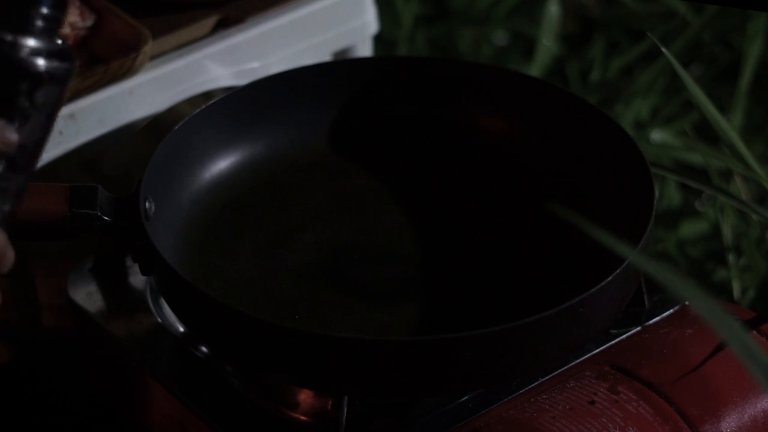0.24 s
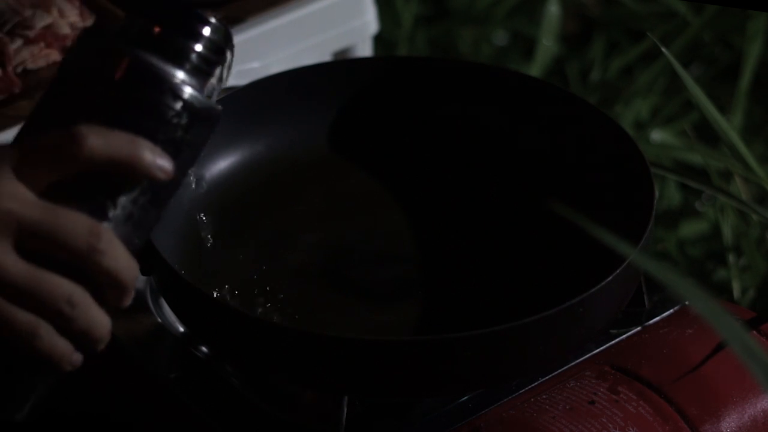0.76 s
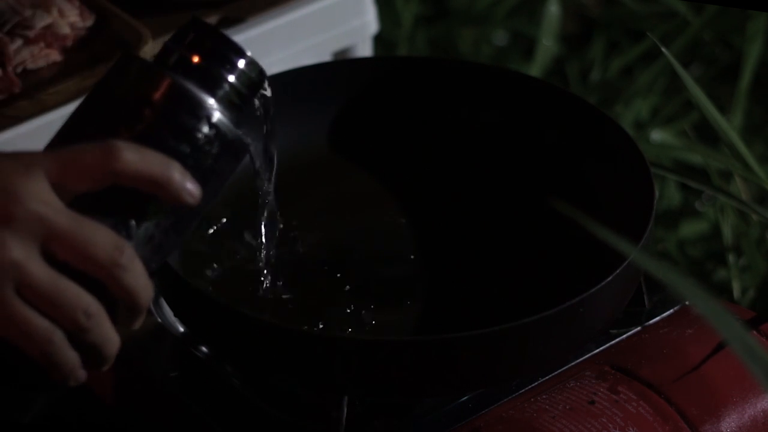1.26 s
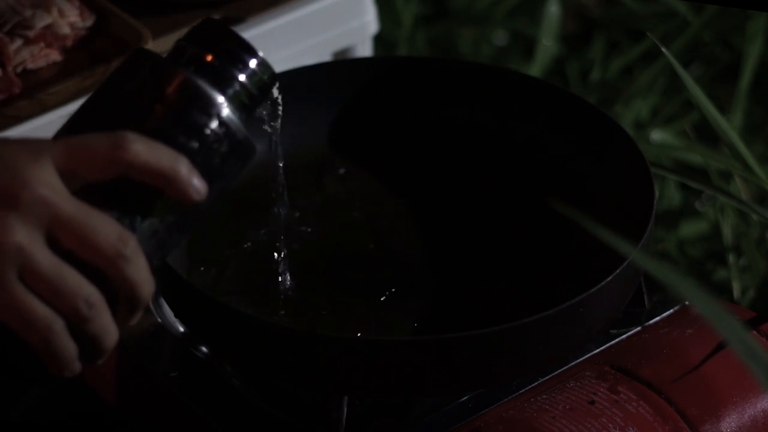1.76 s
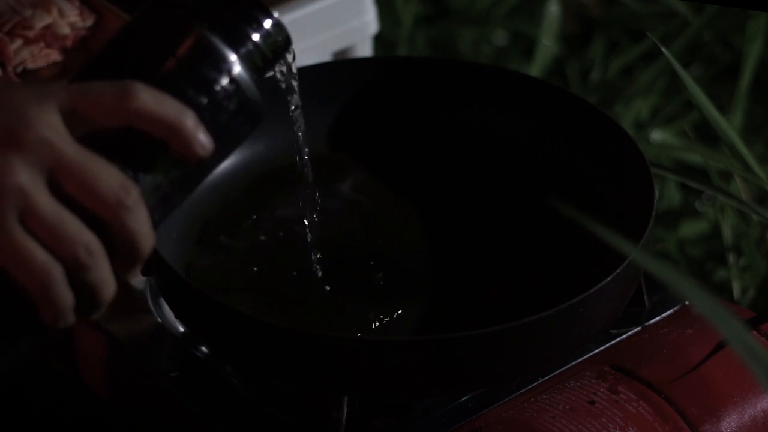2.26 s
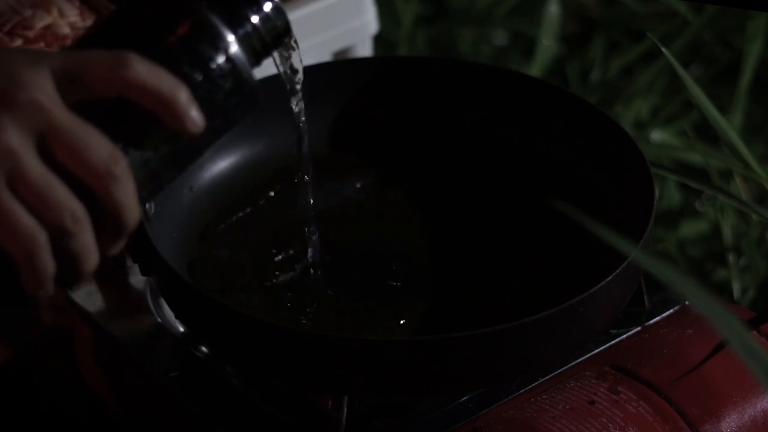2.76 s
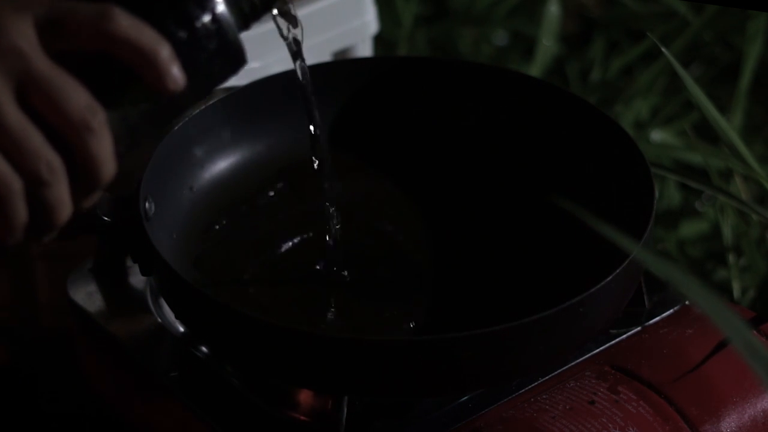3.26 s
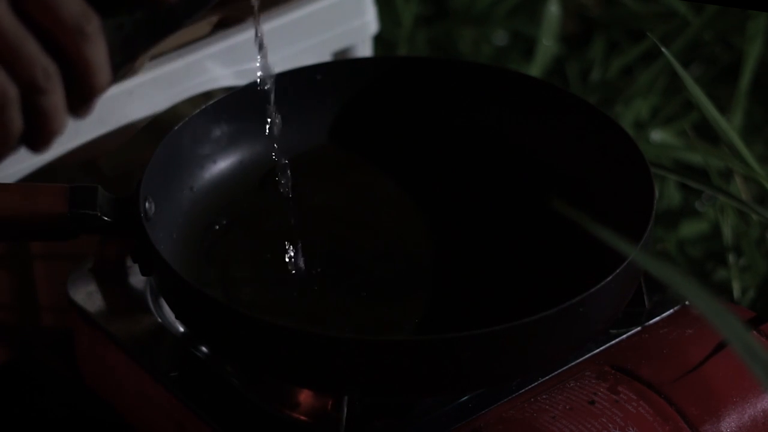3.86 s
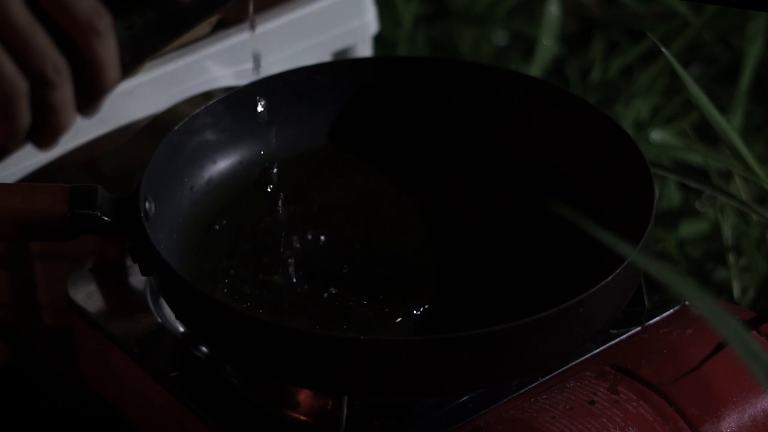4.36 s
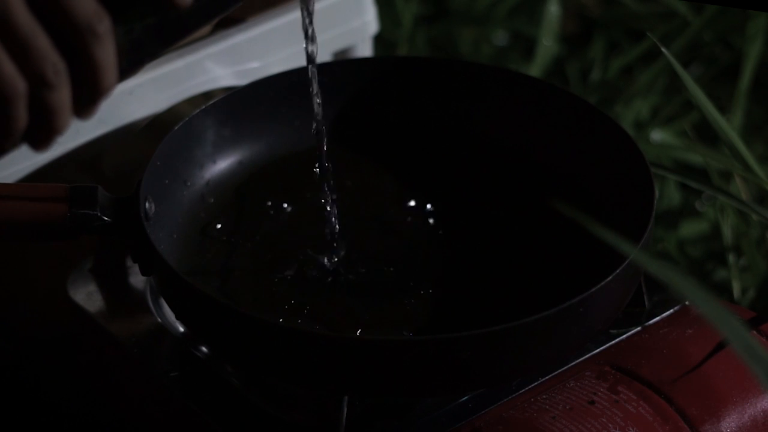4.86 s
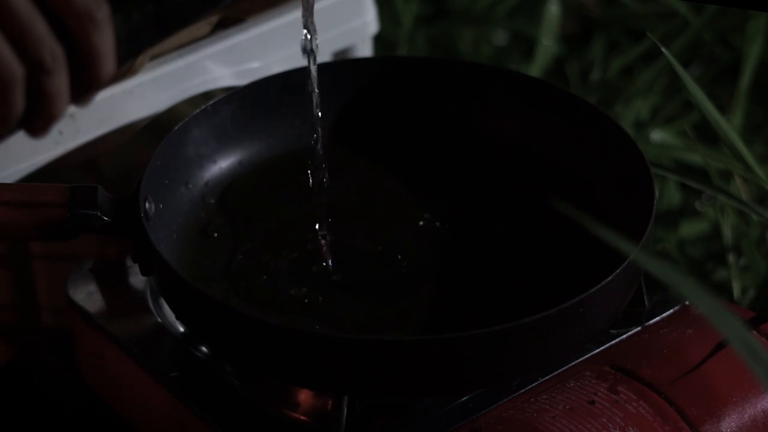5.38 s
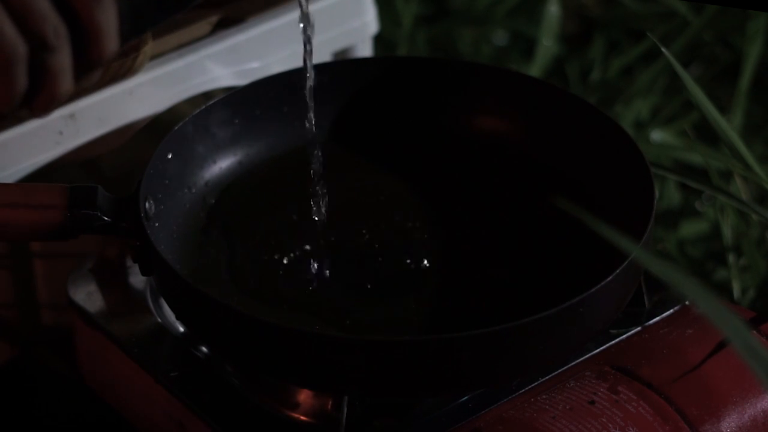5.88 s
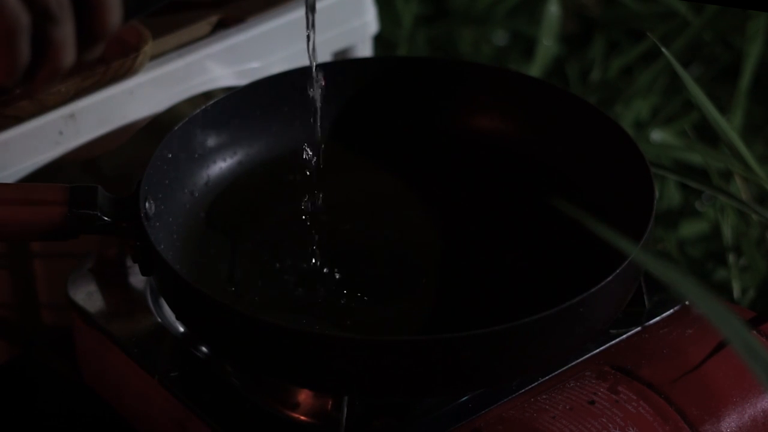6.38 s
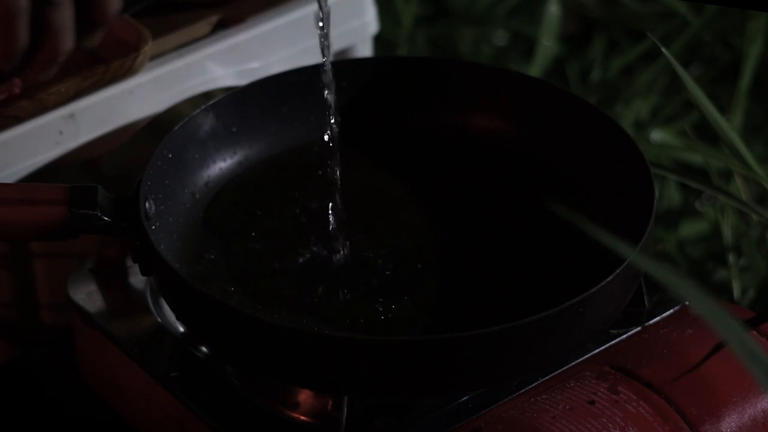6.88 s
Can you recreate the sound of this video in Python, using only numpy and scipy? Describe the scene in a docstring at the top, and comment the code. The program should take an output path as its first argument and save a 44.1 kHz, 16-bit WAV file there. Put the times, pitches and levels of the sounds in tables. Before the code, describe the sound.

Outdoors at night, a steady bed of crickets and fine insect hiss runs throughout. Just before one second a thin stream of water starts hitting a frying pan, faint and fizzy. It stays light until nearly four seconds, then breaks into brighter splashes, crisp droplet ticks and short metallic plinks, busiest in the last two seconds. Close stereo microphone, almost no bass, dry open air.

```python
"""Outdoors at night, among evenly chirping crickets, water runs in a thin stream from a metal flask into a frying pan.
The stream fizzes with tiny bursts and throws ticking droplets, each a snap of shaped noise.
Trapped bubbles plink as short rising sines and ring the pan's modes, whose pitch sinks as it fills.
Crickets are wavering tones over noise bands; a close stereo microphone with almost no bass hears it all,
and its gain dips after the sharpest ticks."""
import sys
import numpy as np
from scipy import signal
from scipy.fft import rfft, irfft, next_fast_len
from scipy.io import wavfile

SR = 44100
rng = np.random.default_rng(int(sys.argv[2]) if len(sys.argv) > 2 else 0)


def master(y):
    """Save y as 16-bit WAV."""
    cut = np.clip(np.atleast_2d(y).T, -1, 1)
    pcm = np.round(cut * 32767)  # scale
    wavfile.write(sys.argv[1], SR, pcm.astype(np.int16))


N = 314433
TIME = np.arange(N) / SR
TOP_HZ = 16000  # upper edge of the treble
# larger bubbles and slugs of water on the pan:
# (time [s], relative level [dB], starting pitch [Hz], relative pan ring [dB], ring tilt [dB per octave])
BUBBLES = [(1.445, -53, 3800, -65.5, 15), (3.816, -38, 5830, -51, -11), (3.876, -53, 4240, -56, -12),
           (4.36, -38, 3800, -64, -1), (4.3788, -24, 3245, -43, -1), (4.859, -32.5, 2860, -61.5, -7),
           (5.3487, -27, 5700, -58, -3), (5.443, -54, 4000, -57.5, -8), (5.6129, -19.5, 3200, -49, 16.5),
           (5.9536, -28, 4750, -48, 2), (6.0035, -39, 4400, -45.5, 0), (6.0888, -23, 4280, -52, 17),
           (6.7768, -30.5, 5940, -52.5, -17), (6.8925, -28.5, 7070, -51.5, -11),
           (6.9869, -33.5, 8000, -59.5, -9), (7.097, -43, 3550, -60, -5), (7.1245, -25.5, 4410, -47, 8)]
# modes of the pan with a little water in it: (nominal pitch [Hz], relative level [dB], t60 [s])
MODES = [(1767, -17.5, 0.18), (2300, -0.5, .23), (2960, -7, 0.16), (3590, -9, 0.28), (3773, 2.5, .25),
         (4630, -7.5, .14)]
TILT_PIVOT_HZ = MODES[1][0]  # ring tilts turn about the second mode


def undb(db):
    """Decibels to gain."""
    return 10 ** (np.asarray(db) / 20)


def curve(rows):
    """Join (time, value) rows by straight lines."""
    return np.interp(TIME, *np.transpose(rows))


def unit(x):
    """Scale to rms 1."""
    return x / np.sqrt(np.mean(np.abs(x) ** 2) + 1e-30)


def sides(right_db):
    """Left and right gains of a source that lies to the right."""
    return unit(undb(np.array([[-right_db], [right_db]]) / 2))


def add(out, s, sound):
    """Mix a sound into out from time s."""
    i = int(np.clip(s * SR, 0, N - 1))
    out[..., i:i + sound.shape[-1]] += sound[..., :N - i]


def colour(x, points):
    """Filter by a spectrum of (frequency [Hz], level [dB]) points; rms 1."""
    hz, db = np.transpose(points)
    size = next_fast_len(N)
    f = np.fft.rfftfreq(size, 1 / SR)
    gain = undb(np.interp(np.log(f + 1), np.log(hz), db))
    return unit(irfft(rfft(x, size) * gain, size)[..., :N])


def band(hz, width_hz, size=N):
    """Noise in a bell-shaped band, unrelated left and right; rms 1."""
    padded = next_fast_len(size)
    bell = np.exp(-2 * ((np.fft.rfftfreq(padded, 1 / SR) - hz) / width_hz) ** 2)
    noise = rng.standard_normal((2, padded))
    return unit(irfft(rfft(noise) * bell, padded)[:, :size])


def walk(rate):
    """Smooth random wandering: `rate` normal draws a second, joined by straight lines."""
    steps = rng.standard_normal(4096)
    return np.interp(TIME * rate, np.arange(len(steps)), steps)


def scatter(x, tail_db, tail_s, wall_s=.0008, wall_db=-8):
    """The pan's wall returns a quick echo, then a short diffuse rattle of reflections."""
    t = np.arange(1500) / SR
    response = rng.standard_normal((2, len(t))) * np.exp(-t / tail_s) * (t > wall_s / 2)
    response *= undb(tail_db) / np.sqrt(np.sum(response ** 2, axis=1, keepdims=True))
    response[:, 0] = 1  # direct sound
    for ear in response:
        ear[int(wall_s * SR * rng.uniform(.6, 1.4))] += undb(wall_db)
    return signal.fftconvolve(np.atleast_2d(x), response, axes=1)


def night(level_db=-53):
    """Even hiss of far insects and air: coloured noise whose level wanders a little."""
    # hiss spectrum: (frequency [Hz], relative level [dB])
    hiss = [(30, -42), (700, -42), (1000, -41.5), (1300, -17.5), (1600, -10.5), (2000, -3.5), (2700, -0.5),
            (3700, 4), (4200, 1), (4700, 4.5), (6100, -1), (7800, -1), (9000, -2.5), (15700, -10)]
    noise = colour(rng.standard_normal((2, N)), hiss)
    return noise * undb(level_db + 0.99 * walk(6.4)) * sides(1.5)


def chorus(flutter_db=1.5, drift_db=0.71):
    """The distant insect chorus: noise bands whose levels flutter fast and drift slowly."""
    # insect bands: (centre [Hz], width [Hz], mean level [dB], to the right [dB])
    bands = [(3142, 130, -56.5, 0.5), (3412, 130, -60, 11.5), (5057, 450, -54, 8.5), (5310, 290, -50, 6),
             (5535, 200, -54.5, 6), (7175, 120, -63.5, 8), (7630, 780, -64, 9.5), (10650, 1100, -64.5, 3.5),
             (12800, 500, -69.5, 3)]
    out = np.zeros((2, N))
    for hz, width_hz, db, right_db in bands:
        level_db = db + flutter_db * walk(70) + drift_db * walk(4.4)
        out += band(hz, width_hz) * undb(level_db) * sides(right_db)
    return out


def chirping(first_s, per_s, song_db, uneven_db):
    """Chirps on an even beat, each a little louder or softer than the song: (time [s], level [dB])."""
    times = np.arange(first_s, N / SR, 1 / per_s)
    db = np.interp(times, TIME, song_db + np.zeros(N)) + uneven_db * rng.standard_normal(len(times))
    return list(zip(times, db))


def cricket(chirps, hz, length_s, width_hz, clear_db, sag_hz, lag_rad):
    """A wing tone that sags through each chirp, blurred by the grass it passes through."""
    loud, sag = np.zeros(N), np.zeros(N)
    u = np.linspace(0, 1, int(length_s * SR))
    for s, db in chirps:
        add(loud, s - length_s / 2, undb(db) * np.sin(np.pi * u))
        add(sag, s - length_s / 2, np.sin(2 * np.pi * u))
    pitch = hz + sag_hz * sag + width_hz / 8 * walk(30)
    phase = 2 * np.pi * np.cumsum(pitch) / SR
    tone = np.sqrt(2) * np.sin(phase - np.array([[lag_rad], [0]]))  # left lags right
    return loud * unit(undb(clear_db) * tone + band(hz, width_hz))


def trilling_cricket():
    """A cricket well to the right sings slow, irregular trills, more blur than tone."""
    # trills: (time [s], level [dB])
    trills = [(.2, -53), (1.03, -52), (1.43, -51), (2.15, -52.5), (2.92, -50.5), (3.55, -54), (4.0, -54),
              (4.5, -55), (5.08, -49), (5.7, -49.5), (6.13, -48.5)]
    song = cricket(trills, hz=4915, length_s=.3, width_hz=150, clear_db=-8.5, sag_hz=9.2, lag_rad=.4)
    return song * sides(12.0)


def high_crickets():
    """Two high crickets on slightly different beats drift in and out of step."""
    out = np.zeros((2, N))
    for first_s, per_s, db in [(.15, 5.397, -56), (.105, 5.195, -59)]:
        chirps = chirping(first_s, per_s, db, uneven_db=-0.2)
        out += cricket(chirps, hz=7253, length_s=.15, width_hz=140, clear_db=1.5, sag_hz=19, lag_rad=1.6)
    return out * sides(4.0)


def low_cricket(song_gain_db=-1.5):
    """The nearest low cricket chirps evenly on and falters once."""
    # its song: (time [s], relative level [dB])
    song = [(0, -45.5), (0.7, -51.5), (1.9, -47.5), (4.8, -48.5), (5.55, -50.5), (5.87, -70), (6.2, -48),
            (7.1, -51)]
    chirps = chirping(.044, 13.862, curve(song) + song_gain_db, uneven_db=1.1)
    tone = cricket(chirps, hz=3180, length_s=0.054, width_hz=125.2, clear_db=8, sag_hz=11, lag_rad=1.2)
    return tone * sides(0.33)


def pan(flow_db, ring_db=3, patter_db=-13, patter_tilt_db=-7, rise_db=2.5, push_s=0.0023, slosh=0.0018,
        lag_rad=1.0):
    """Resonant modes ring at every plink and hum under the patter; filling and sloshing bend their pitch."""
    # the water's weight lowers the modes: (time [s], mean pitch ratio)
    weight = [(0, 1.02), (4.4, 0.999), (5.6, 0.979), (7.1, 0.963)]
    out, t = np.zeros((2, N)), np.arange(SR // 2) / SR
    turns = np.cumsum(curve(weight) * (1 + slosh * walk(40))) / SR
    push = np.hanning(int(push_s * SR) + 3)
    push /= push.sum()
    # as the flask is lifted, the hum gains rise_db a second on the spatter until 4 s
    patter = undb(flow_db + patter_db + rise_db * np.minimum(TIME - 4, 0))
    ears = np.exp(-1j * np.array([[lag_rad], [0]]))
    for hz, db, t60 in MODES:
        octaves = np.log2(hz / TILT_PIVOT_HZ)
        fade = np.exp(-np.log(1000) * t / t60)
        blows = rng.standard_normal(N) * patter * undb(patter_tilt_db * octaves) / np.sqrt(np.sum(fade ** 2))
        blows = blows * np.exp(2j * np.pi * rng.random(N))
        for s, _, _, blow_db, tilt_db in BUBBLES:
            blow = undb(blow_db + ring_db + tilt_db * octaves) * push
            add(blows, s, blow * np.exp(2j * np.pi * rng.random()))
        ring = signal.lfilter([1], [1, -fade[1]], blows)  # decaying envelope of the mode
        out += undb(db) * np.imag(ears * ring * np.exp(2j * np.pi * hz * turns))
    return out * sides(4.5)


def spatter(attack_s=0.0061, release_s=0.05):
    """Spatter level in dB: the unbroken stream plus splashes that swell, hold and die away."""
    # spatter of the unbroken stream, growing on the whole as the flask is lifted: (time [s], level [dB])
    stream = [(0, -81.5), (0.7, -75.5), (0.8, -59.5), (2.2, -66.5), (3.5, -66), (4.6, -60), (5.5, -56),
              (6.3, -58.5), (7.1, -53.5)]
    # the stream wavers, breaks up and splashes: (start [s], level [dB], hold [s])
    splashes = [(0.973, -53, 0.1), (1.697, -56.5, 0.034), (3.643, -53.5, 0.009), (3.816, -56.5, 0.11),
                (4.31, -51.5, .09), (4.683, -52.5, 0.018), (4.791, -48, 0.06), (5.20, -57.5, 0.034),
                (5.505, -56.5, 0.09), (5.602, -45.5, 0.14), (5.92, -51.5, 0.12), (6.082, -46.5, 0.053),
                (6.512, -52, 0.14), (6.907, -52, 0.13), (7.102, -42, 0.057)]
    power = undb(curve(stream)) ** 2
    for s, db, hold_s in splashes:
        before = np.maximum(s - TIME, 0) / attack_s
        after = np.maximum(TIME - s - hold_s, 0) / release_s
        power = power + (undb(db) * np.exp(-np.minimum(before + after, 20))) ** 2
    return 10 * np.log10(power)


def spray(flow_db, rate=1000, spread_db=3.0, gain_db=1.0, count=4):
    """Countless tiny bursts where the stream breaks the surface, at a few spots with their own echoes."""
    # colour of the fine spray: (frequency [Hz], relative level [dB])
    tint = [(1200, -40.5), (2000, -13.5), (4000, -5), (6000, -7.5), (8000, -8.5), (10500, -7.5),
            (12500, -5.5), (14800, -1), (16500, -14)]
    fizz = np.zeros((2, N))
    for _ in range(count):
        bursts = rng.random(N) < rate / count / SR  # rate is bursts per second over all spots
        size = rng.exponential(size=N)
        clicks = bursts * undb(spread_db * np.minimum(size, 4)) * rng.choice([-1, 1], N)
        fizz += scatter(clicks, tail_db=0.5, tail_s=0.0019)[:, :N]
    return colour(fizz, tint) * undb(flow_db + gain_db) * sides(2.7)


def churn(hz=3900, width_hz=1500, gain_db=2, attack_s=0.0007, decay_s=.015):
    """Water churns as a burst of band noise after each slug, more after the hard, bright blows."""
    out, t = np.zeros((2, N)), np.arange(8192) / SR
    swell = (1 - np.exp(-t / attack_s)) * np.exp(-t / decay_s)
    for s, _, _, blow_db, tilt_db in BUBBLES:
        db = blow_db + gain_db + tilt_db * np.log2(hz / TILT_PIVOT_HZ)
        add(out, s, undb(db) * band(hz, width_hz, size=len(t)) * swell)
    return out * sides(2)


def bubble(t, hz, decay_s, rise, swell_cycles=1.03):
    """A bubble swells within a cycle or two and rings briefly, its pitch rising as it nears the surface."""
    age = t / decay_s
    swell = 1 - np.exp(-(t * hz / swell_cycles) ** 2)
    cycles = hz * np.cumsum(1 + rise * np.minimum(age, 4)) / SR
    return swell * np.exp(-age) * np.sin(2 * np.pi * cycles)


def gulps(decay_s=0.0095):
    """Gulps of the falling water: bubbles whose pitch glides up steeply."""
    # gulps: (time [s], relative level [dB], starting pitch [Hz])
    falls = [(4.808, -50, 2430), (4.854, -49, 1590), (4.865, -48, 1990)]
    out, t = np.zeros((2, N)), np.arange(4000) / SR
    for s, db, hz in falls:
        gulp = undb(db) * bubble(t, hz, decay_s, rise=0.31)
        add(out, s, scatter(gulp, tail_db=0, tail_s=0.0077))
    return out * sides(2.2)


def plinks(rise=0.011, gain_db=-1, slap_db=-7, slap_s=0.001, slap_hz=2900, fade_cycles=13.6):
    """Larger bubbles sound in the shallow water, fading to 1/e in fade_cycles, each with a wet noise slap."""
    out, t = np.zeros((2, N)), np.arange(4000) / SR
    wet = signal.butter(4, [slap_hz, 11000], "band", fs=SR, output="sos")
    for s, db, hz, _, _ in BUBBLES:
        burst = 2 * rng.standard_normal(len(t)) * np.exp(-t / slap_s)
        slap = undb(slap_db) * signal.sosfilt(wet, burst)
        plink = bubble(t, hz, fade_cycles / hz, rise) + slap
        add(out, s, scatter(undb(db + gain_db) * plink, tail_db=-2.5, tail_s=0.0057, wall_db=-27.5))
    return out * sides(2.2)


def stray_drops(flow_db, count=200, above_db=6, spread_db=3.0, low_hz=9500, high_hz=15200):
    """Small random drops, their strength following the spatter: (time [s], relative level [dB], pitch [Hz])."""
    when, size, pitch = rng.random((count, 3)).T
    at = ((np.arange(count) + when) / count * (N - 1)).astype(int)  # one in each equal slice of time
    db = flow_db[at] + above_db + spread_db * np.minimum(-np.log(1 - size), 2)
    return list(zip(TIME[at], db, low_hz + (high_hz - low_hz) * pitch))


def droplets(flow_db, burst_s=.00007, width_hz=4200, skirt_db=-15, right_db=6, wander_db=2.0):
    """Each droplet is a snap a fraction of a millisecond long, with its own pitch and place in the pan."""
    # the loudest droplets and tiny bubbles bursting: (time [s], relative level [dB], pitch [Hz])
    loudest = [(0.8722, -33.5, 12000), (2.8508, -37, 9400), (3.8152, -32, 13100), (3.877, -38, 13600),
               (4.4003, -34.5, 12200), (4.7374, -38.5, 8800), (4.7793, -39, 14500), (4.7916, -30, 11900),
               (4.841, -38, 9300), (5.2107, -38, 10300), (5.2433, -40.5, 11800), (5.3485, -33.5, 13300),
               (5.5668, -37, 13200), (5.6136, -34.5, 12000), (5.6615, -31.5, 13300), (5.7075, -25, 10500),
               (5.7175, -29, 14100), (5.8993, -38.5, 12300), (5.9371, -35, 10500), (5.9538, -29.5, 11100),
               (6.0039, -25.5, 14400), (6.0872, -28.5, 13900), (6.5046, -35.5, 13700), (6.5362, -36, 14400),
               (6.5687, -34, 13920), (6.615, -30, 14400), (6.6375, -31, 12500), (6.6825, -21.5, 14100),
               (6.7768, -35, 14300), (6.8923, -28.5, 14000), (6.9342, -35, 11500), (7.0845, -36, 14500),
               (7.107, -31, 14400)]
    out, t = np.zeros((2, N)), np.arange(256) / SR
    f = np.fft.rfftfreq(len(t), 1 / SR)
    skirt = undb(skirt_db) / (1 + (6500 / (f + 1)) ** 8)  # broad treble under the pitch
    for s, db, hz in [*loudest, *stray_drops(flow_db)]:
        burst = rfft(rng.standard_normal(len(t)) * t * np.exp(-t / burst_s))
        evened = burst / np.sqrt(np.abs(burst) + 1e-18)
        shape = np.exp(-2 * ((f - hz) / width_hz) ** 2) + skirt
        snap = np.roll(irfft(evened * shape * (f < TOP_HZ + 500)), 16)
        place = sides(right_db + wander_db * rng.standard_normal())
        add(out, s - .0006, place * scatter(unit(snap) * undb(db) / 2, tail_db=-1.5, tail_s=0.003))
    return out


def scene():
    """The insects all round, the pour in front."""
    flow_db = spatter()
    insects = chorus() + trilling_cricket() + high_crickets() + low_cricket()
    water = spray(flow_db) + churn() + gulps() + plinks() + droplets(flow_db)
    return night() + insects + pan(flow_db) + water


def microphone(x, peak_hz=14750, peak_q=14, peak_db=-5, wide_hz=1900, wide_share=0.37):
    """A small peak in the top treble; the lowest tones lose part of their middle and sound wide."""
    peak = signal.lfilter(*signal.iirpeak(peak_hz, peak_q, fs=SR), x)
    low_middle = signal.filtfilt(*signal.butter(2, wide_hz, fs=SR), x.mean(axis=0))
    return x + undb(peak_db) * peak - wide_share * low_middle


def record(dry, limit_db=-14, recover_db=14, depth=0.33, low_cut_hz=1250, lag_s=0.021):
    """Steep bass cut; gain control that ducks just after a peak and creeps back; top cut."""
    low_cut = signal.butter(5, low_cut_hz, "high", fs=SR, output="sos")
    x = signal.sosfilt(low_cut, microphone(dry))
    over_db = np.maximum(20 * np.log10(np.abs(x).max(axis=0) + 1e-9) - limit_db, 0)
    # the held excess falls by recover_db a second; the gain drops by a share, depth, of it
    held_db = np.maximum.accumulate(over_db + recover_db * TIME) - recover_db * TIME
    lag = np.exp(-1 / (lag_s * SR))
    x = x * undb(-depth * signal.lfilter([1 - lag], [1, -lag], held_db))
    x = x + undb(-96.0) * rng.standard_normal(N)  # faint self-noise
    return signal.sosfilt(signal.ellip(8, .2, 70, TOP_HZ, fs=SR, output="sos"), x)


dry = scene()
out = record(dry)
master(out)
```